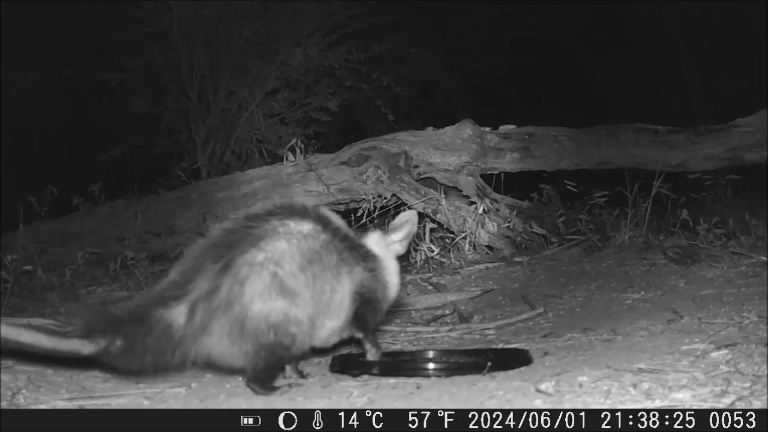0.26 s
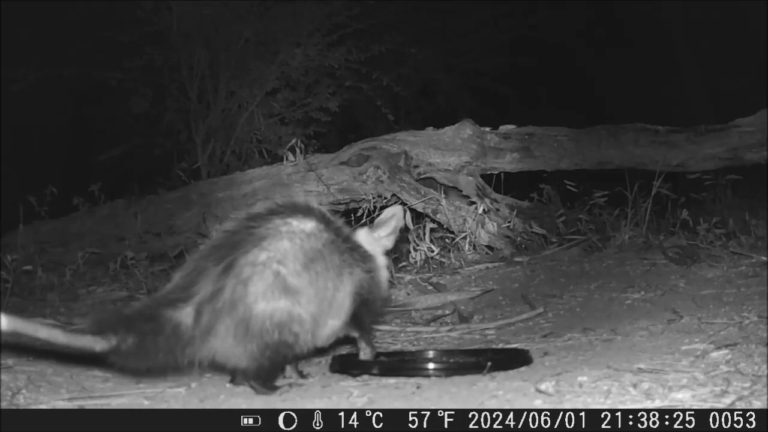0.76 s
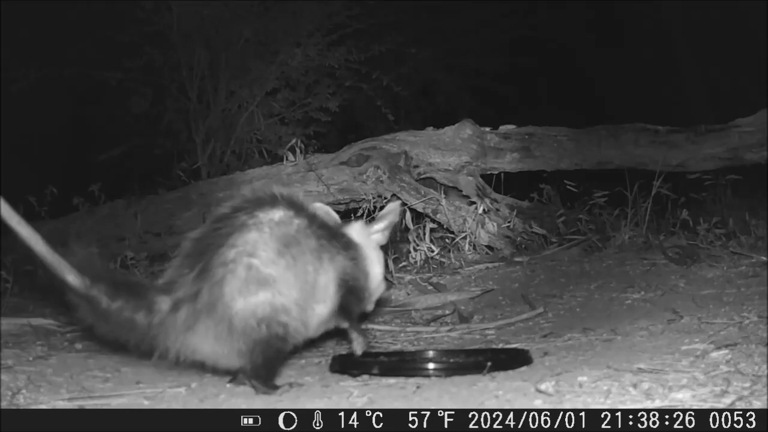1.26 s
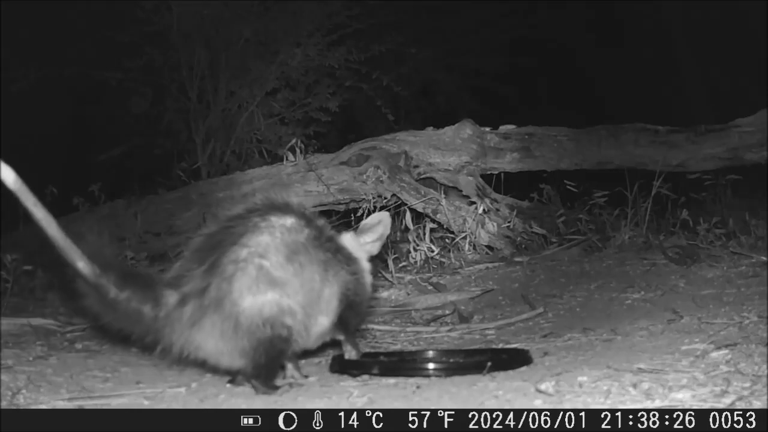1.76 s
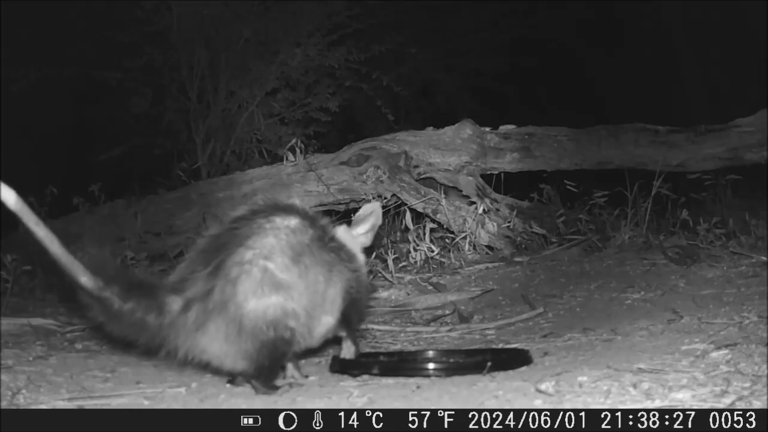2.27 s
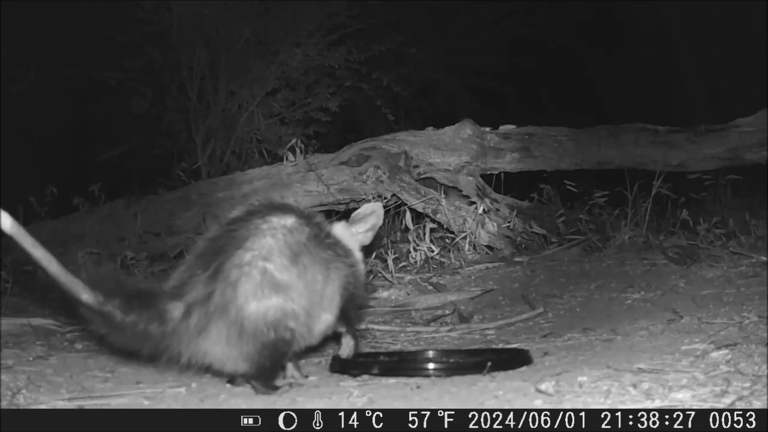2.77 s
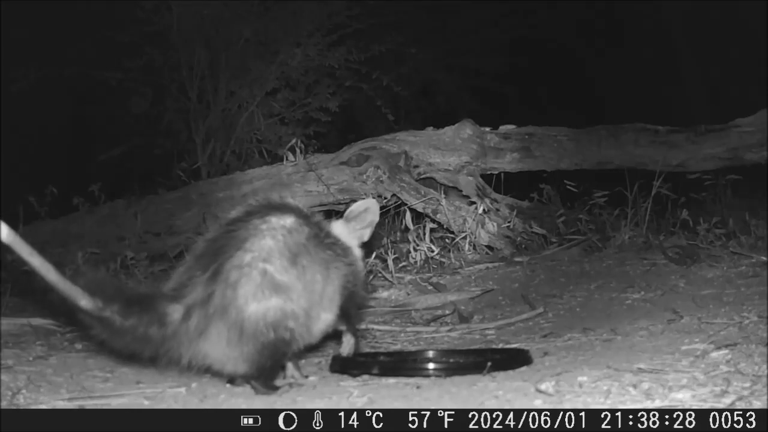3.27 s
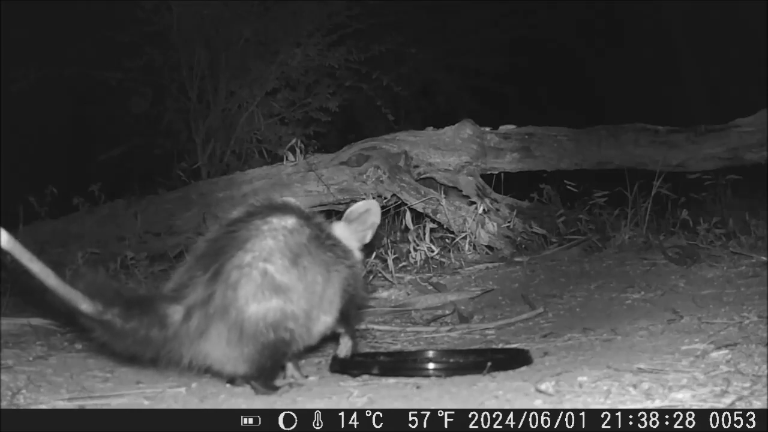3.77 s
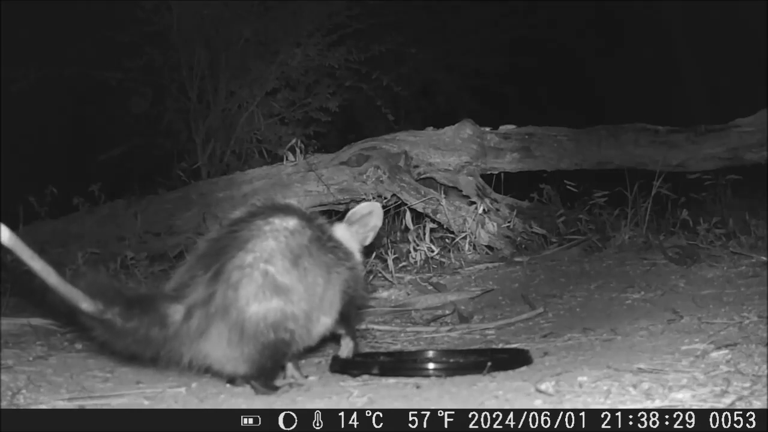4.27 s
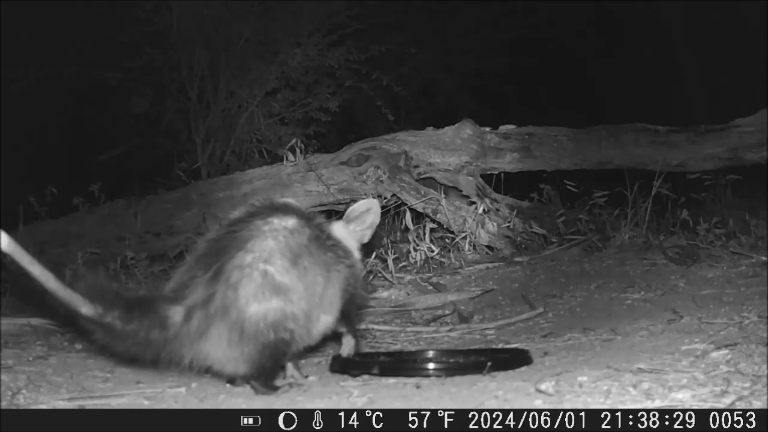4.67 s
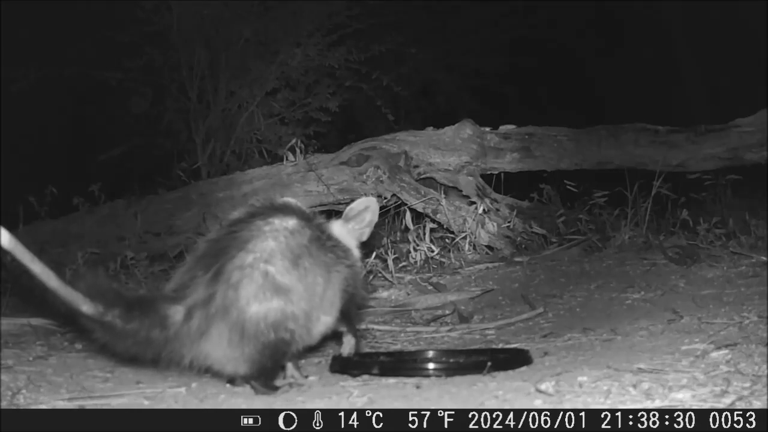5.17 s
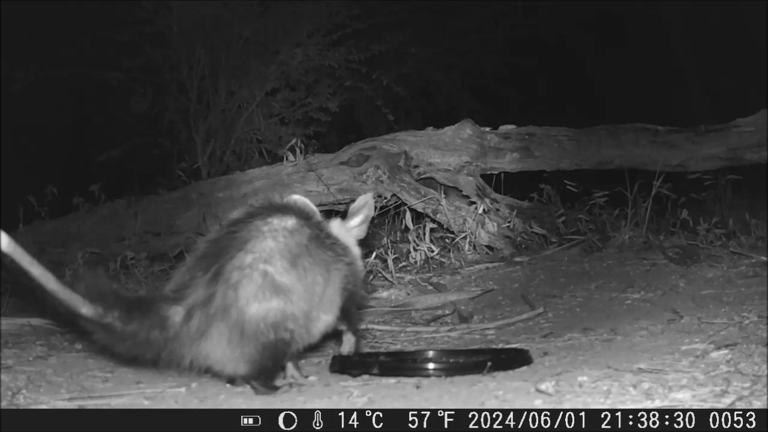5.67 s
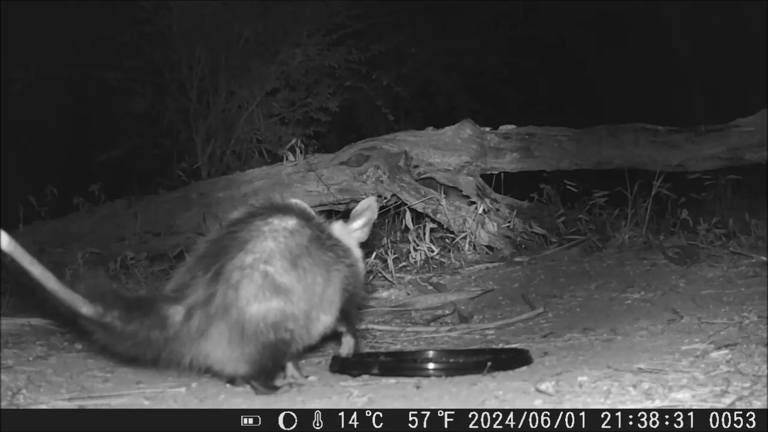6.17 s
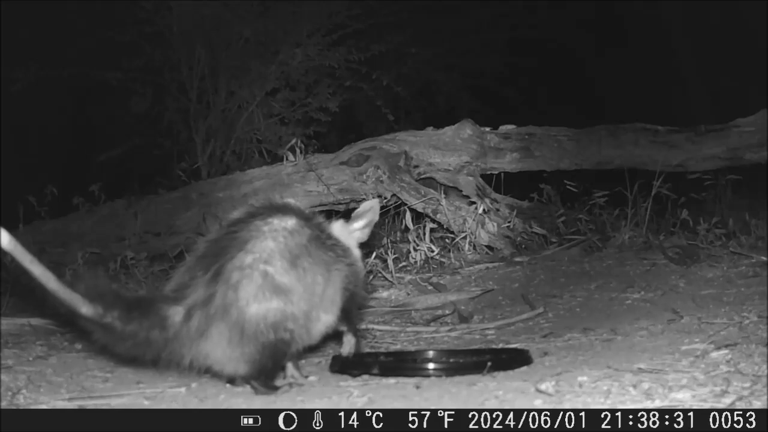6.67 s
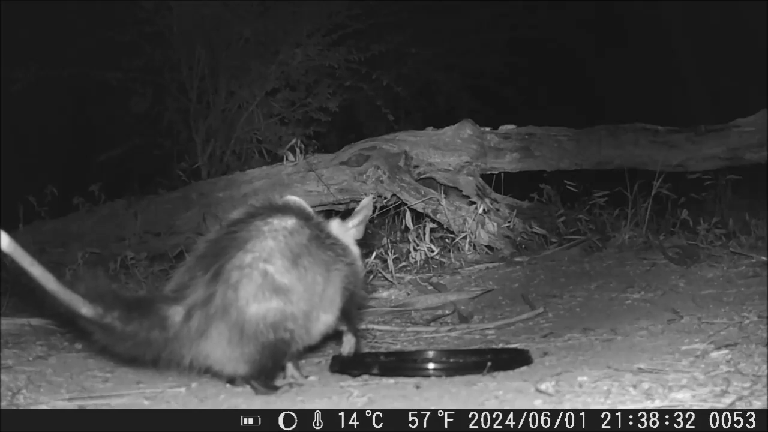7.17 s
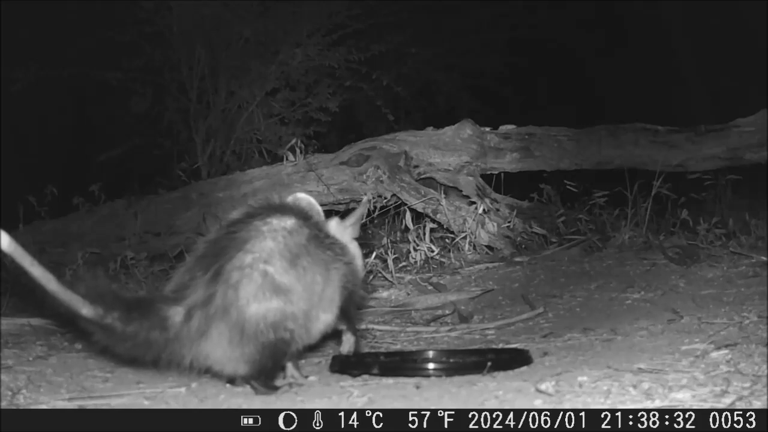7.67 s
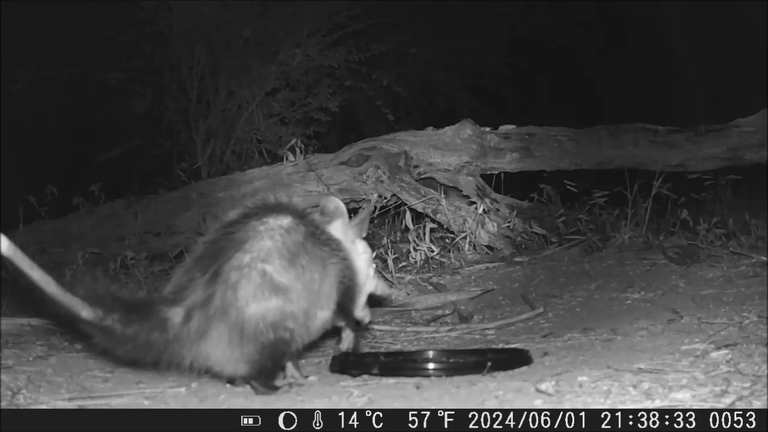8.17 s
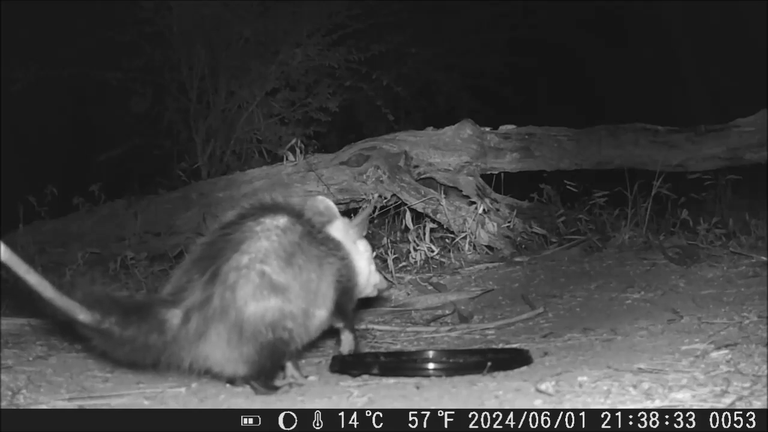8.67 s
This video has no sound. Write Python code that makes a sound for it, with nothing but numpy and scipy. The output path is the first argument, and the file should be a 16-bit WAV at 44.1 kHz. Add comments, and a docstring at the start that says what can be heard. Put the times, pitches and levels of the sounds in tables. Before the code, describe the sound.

A nearby cricket trills high and steadily at the edge of a wood at night, its song often breaking into quick chirps and growing a little louder later on. Another insect rasps in groups of short hissing syllables, about two groups a second. A distant cricket chorus sings lower and a faint bush cricket ticks very high. Far machinery hums softly underneath, all picked up by one microphone.

```python
"""A near cricket trills at a wood edge at night, each wing stroke a tone pulse that falls in pitch.
A broad rasping hiss calls in groups of short syllables, about two groups a second.
A small bush cricket ticks high, and a far chorus sings lower; the undergrowth scatters their songs.
Machinery hums far off under the night air, and one soft tick sounds nearby.
One microphone hears it all, and the recorder drops out once for a few milliseconds."""
import sys
import numpy as np
from scipy import signal
from scipy.fft import rfft, irfft, next_fast_len
from scipy.io import wavfile
from scipy.ndimage import uniform_filter1d, map_coordinates

SR = 44100
rng = np.random.default_rng(int(sys.argv[2]) if len(sys.argv) > 2 else 0)


def digitize_waveform(pressure):
    """Quantize a signal to 16-bit integers and store it at the path in sys.argv[1].

    Rows of a 2-D input are taken as channels; values are limited to [-1, 1].
    """
    field = np.atleast_2d(pressure).T
    bounded = np.clip(field, -1, 1)
    quanta = np.round(bounded * 32767).astype(np.int16)
    wavfile.write(sys.argv[1], SR, quanta)


N = 393813
TIME = np.arange(N) / SR


def amp(db):
    """Amplitude ratio: a factor of ten for every 20 dB."""
    return 10 ** (np.asarray(db) / 20)


def unit(x):
    """Normalisation to an rms of 1."""
    return x / np.sqrt(np.mean(x ** 2) + 1e-20)


def curves(rows):
    """Linear interpolation over time of each column after the first."""
    times, *columns = np.transpose(rows)
    return [np.interp(TIME, times, column) for column in columns]


def wobble(rate):
    """Random modulation: a smooth curve through rate Gaussian knots a second."""
    coarse = TIME[::64]
    knots = rng.standard_normal(int(N * rate / SR) + 4)
    return np.interp(TIME, coarse, map_coordinates(knots, [coarse * rate]))


def filtered(x, response):
    """Linear filtering: the spectrum is multiplied by a frequency response."""
    size = next_fast_len(N + SR // 2)
    return irfft(rfft(x, size) * response(np.fft.rfftfreq(size, 1 / SR)), size)[..., :N]


def hiss(spectrum, patchy_db):
    """Spectral shaping: coloured noise of rms 1, its gain patchy in time and frequency."""
    frames = signal.stft(rng.standard_normal(N), nperseg=512)[2]
    patches = uniform_filter1d(rng.standard_normal(frames.shape), size=5, axis=0)
    patches = uniform_filter1d(patches, size=10, axis=1)
    white = signal.istft(frames * amp(patchy_db * unit(patches)), nperseg=512)[1][:N]
    knot_hz, db = np.transpose(spectrum)
    return unit(filtered(white, lambda hz: amp(np.interp(np.log(hz + 1), np.log(knot_hz), db))))


def pulses(times, hz, db, half_s, glide_hz, overtone_db=-60):
    """Linear chirps under raised-cosine envelopes centred on times, gliding by glide_hz per half_s."""
    t = np.arange(-300, 301) / SR
    phase = 2 * np.pi * (hz[:, None] * t + glide_hz / half_s * t * t / 2 + rng.random((len(times), 1)))
    wave = np.sin(phase) + amp(overtone_db) * np.sin(2 * phase)
    envelope = np.cos(np.pi / 2 * np.clip(t / half_s, -1, 1)) ** 2
    samples = np.round((times[:, None] + t) * SR).astype(int).clip(0, N)
    return np.bincount(samples.ravel(), (amp(db)[:, None] * envelope * wave).ravel(), N + 1)[:N]


def echoes(x, t60, count=4):
    """Diffuse scattering in undergrowth: decaying tails whose mix changes as leaves and singer shift."""
    t = np.arange(SR // 4) / SR
    tails = rng.standard_normal((count, len(t))) * amp(-60 * t / t60)
    tails /= np.linalg.norm(tails, axis=1, keepdims=True)
    answers = signal.fftconvolve(x[None], tails, axes=1)[:, :N]
    shares = np.array([wobble(5) for _ in answers])
    return np.sum(answers * shares, axis=0) / np.linalg.norm(shares, axis=0)


def night_air():
    """Ambient noise: a continuous spectrum with a low rumble and a high band of hiss."""
    # Each row: frequency in Hz, relative spectral density in dB.
    spectrum = [(15, -42), (35, -6), (60, -0.5), (130, -7.5), (250, -16.5), (450, -25), (900, -26),
                (1700, -23.5), (2100, -32), (2450, -17.5), (3600, -35), (5000, -26.5), (6200, -5),
                (7500, -24), (10200, -31.5), (11300, -35.5), (12000, -25), (13200, -26), (14000, -44),
                (16500, -53)]
    return amp(-52.5) * hiss(spectrum, patchy_db=1.0)


def machinery_hum():
    """A line spectrum from far machinery: random modulation broadens a low tone and higher lines."""
    # The low tone. Each row: time in seconds, level in dB.
    levels = [(0, -53.5), (1.7, -52), (3.0, -54.5), (3.21, -49.5), (3.41, -59), (3.6, -52.5), (4.25, -53.5),
              (4.43, -61), (4.6, -56), (5.3, -55.5), (6.0, -54.5), (7.9, -55.5), (8.03, -59.5), (8.23, -53),
              (8.93, -57)]
    # The higher lines. Each row: frequency in Hz, mean level in dB, frequency waver in Hz.
    lines = [(117.5, -65.5, 2.5), (175.8, -76, 3.28), (239.4, -71, 0.61), (294, -83, 2.6), (418, -86.5, 3),
             (779, -90, 1.5), (840, -91, 1.5)]
    tone = np.sqrt(2) * np.sin(2 * np.pi * 57.3 * TIME + 0.13 * wobble(5) + 0.046 * wobble(40))
    out = amp(curves(levels)[0] + 1.05 * wobble(5.7) + 0.32 * wobble(40)) * tone
    for hz, db, waver_hz in lines:
        phase = 2 * np.pi * np.cumsum(hz + waver_hz * wobble(14)) / SR
        out += amp(db + 2.83 * wobble(9)) * np.sqrt(2) * np.sin(phase)
    return out


def tick():
    """A damped sinusoid, heard as one soft, dull tick nearby."""
    start_s, peak_db, hz, t60 = 5.281, -42, 1160, 0.011
    age = np.clip(TIME - start_s, 0, 1)
    return amp(peak_db - 60 * age / t60) * np.sin(2 * np.pi * hz * age)


def far_chorus(count=4000):
    """Incoherent superposition: rising pulses of many far crickets, about half of the power echo."""
    # Each row: time in seconds, level in dB.
    levels = [(0.0, -52.5), (3.6, -51.5), (3.88, -54.5), (4.03, -50), (4.58, -53), (4.63, -51.5),
              (6.22, -51), (6.29, -44.5), (6.37, -52.5), (6.89, -48), (6.94, -52), (7.78, -48.5),
              (7.86, -51.5), (8.93, -50.5)]
    hz_jitter, db_jitter, time_jitter = rng.standard_normal((count, 3)).T
    times = (np.arange(count) + 1.5 * time_jitter) * N / SR / count
    song = pulses(times, 2840 + 75 * hz_jitter, 0.4 * db_jitter, half_s=0.0057, glide_hz=60.3)
    return amp(curves(levels)[0] + .6 * wobble(6)) * unit(song + amp(-0.5) * echoes(song, t60=0.68))


def bush_cricket(count=880):
    """A high resonance ticks about a hundred times a second; amplitude modulation adds throbs."""
    # Spells of throbbing. Each row: first peak in seconds, length in seconds, depth in dB.
    throbs = [(0.888, .9, 2.5), (1.91, 0.56, 0.5), (3.09, 0.29, 1.5), (4.42, .7, 2), (5.216, 0.23, 4),
              (5.94, .1, 3), (6.238, .1, 1), (8.167, 0.53, 2.5)]
    mean_db, resonance_hz, throbs_per_s, scatter_s = -64.5, 9085, 4.84, .002
    time_jitter, hz_jitter, db_jitter = rng.standard_normal((count, 3)).T
    times = np.arange(count) * N / SR / count + scatter_s * time_jitter
    level_db = mean_db + 0.43 * wobble(14)
    for first_peak, length, depth_db in throbs:
        beat = (TIME - first_peak) * throbs_per_s
        throbbing = (beat > -3 / 4) & (beat < length * throbs_per_s + 1 / 4)
        level_db += depth_db * np.cos(2 * np.pi * beat) * throbbing
    hz = resonance_hz + 60 * np.interp(times, TIME, wobble(9)) + 130 * hz_jitter
    song = pulses(times, hz, 2.3 * db_jitter, half_s=0.0015, glide_hz=-350)
    return amp(level_db) * unit(song + amp(13) * echoes(song, t60=0.2, count=8))


def rasp():
    """Amplitude-modulated noise in three bands: syllables rise, hold and fade, adding in power."""
    # Each row: centre of a syllable in seconds, then its treble, middle and low levels in dB.
    syllables = [(0.064, -61, -50.5, -56.5), (0.192, -60, -50, -59), (0.465, -61, -50.5, -54.5),
                 (0.564, -60, -49.5, -55), (0.658, -61, -49.5, -55), (0.801, -62, -49.5, -55),
                 (0.928, -60, -50, -60), (1.2, -61, -52, -55), (1.312, -60, -49, -55),
                 (1.426, -61, -48, -55.5), (1.845, -59, -49, -53.5), (1.972, -57.5, -47.5, -55.5),
                 (2.308, -59, -48, -54.5), (2.438, -57.5, -47.5, -54.5), (2.72, -61, -52.5, -55),
                 (2.858, -62, -51.5, -54.5), (2.995, -68, -56, -65), (3.198, -61, -50.5, -59),
                 (3.381, -57, -46, -51.5), (3.524, -58, -48, -55.5), (3.951, -61, -49.5, -55),
                 (4.064, -57, -45.5, -52), (4.181, -59, -49, -53.5), (4.68, -57, -46, -52),
                 (4.819, -55.5, -45.5, -52.5), (5.284, -60, -49.5, -59.5), (5.42, -60, -48, -55.5),
                 (5.619, -61, -52.5, -60), (5.757, -57, -46.5, -57), (5.914, -63, -49.5, -57),
                 (6.156, -56, -47.5, -53.5), (6.289, -56.5, -47.5, -52.5), (6.663, -59, -48, -54),
                 (6.774, -58, -48, -53), (6.868, -61, -48.5, -57), (7.095, -61, -51.5, -59),
                 (7.22, -60, -52, -58.5), (7.564, -55.5, -46, -52), (7.703, -55, -44, -53),
                 (8.217, -71, -57, -69), (8.346, -69, -58, -67), (8.478, -59, -47.5, -54.5),
                 (8.597, -56, -47, -53.5), (8.71, -57, -48, -60)]
    # The three bands. Each row: frequency in Hz, relative spectral density in dB.
    treble_spectrum = [(6500, -67), (8000, -9.5), (10000, -7), (12500, -2), (14300, -2.5), (15200, 1),
                       (16500, -1.5)]
    middle_spectrum = [(1000, -47.5), (2400, -7.5), (3000, -5), (3750, -12), (4300, -6), (4550, -3.5),
                       (4800, -3.2), (5050, -5), (5600, -6.5), (6600, -16.5), (7600, -22.5), (8500, -72)]
    low_spectrum = [(900, -53.5), (1300, -15.5), (1700, -12.5), (1950, 1), (2200, 1.5), (2500, -25),
                    (3000, -40.5)]
    # Faint tones in the hiss. Each row: centre and half length in seconds, peak in dB, pitch in Hz.
    whistles = [(.93, .04, -52.5, 1945), (3.497, 0.037, -50, 1950), (5.617, 0.054, -53, 1930),
                (5.757, 0.05, -51, 1950), (7.214, .055, -53, 1910), (7.72, .04, -54, 1957),
                (8.718, 0.036, -51, 1945), (5.623, .04, -52, 4530), (5.917, 0.044, -52, 4600),
                (6.16, .05, -50, 4550), (7.2, .04, -51, 4800), (7.53, 0.045, -48.5, 4720),
                (8.6, .04, -47.5, 4560)]
    # Each triple runs treble, middle, low.
    rise_db_per_s, fall_db_per_s, rest_db = (200, 200, 258), (118, 125, 192), (-77, -58, -62)
    hold_s = 0.063
    power = amp(rest_db)[:, None] ** 2
    for centre, *bands_db in syllables:
        rise_db = np.outer(rise_db_per_s, np.minimum(TIME - centre + hold_s / 2, 0))
        fall_db = np.outer(fall_db_per_s, np.maximum(TIME - centre - hold_s / 2, 0))
        power = power + amp(np.array(bands_db)[:, None] + rise_db - fall_db) ** 2
    treble = amp(.5 * wobble(25)) * hiss(treble_spectrum, patchy_db=-1.0)
    middle = amp(0.47 * wobble(25)) * hiss(middle_spectrum, patchy_db=1.0)
    low = amp(0.77 * wobble(18)) * hiss(low_spectrum, patchy_db=1.5)
    out = np.sum(np.sqrt(power) * [treble, middle, low], axis=0)
    phase_waver = 1.9 * wobble(30)
    for centre, half_s, peak_db, hz in whistles:
        swell = np.cos(np.pi / 2 * np.clip((TIME - centre) / half_s, -1, 1))
        out += amp(peak_db) * swell * np.sin(2 * np.pi * hz * TIME + phase_waver)
    return out


def stroke_rate(idle_per_s):
    """Pulse repetition rate: the wings speed up into each bout, sag, then relax exponentially to idle."""
    # Each row: start in seconds, onset of tiring in seconds, strokes a second before the sag.
    bouts = [(0.03, 1.726, 90.44), (2.353, 3.868, 92.4), (4.455, 5.497, 92.57), (5.618, 6.835, 93.3),
             (7.323, 8.687, 92.44)]
    sag_per_s, pick_up_s, sag_s, tire_s = 2.45, .065, .4, .096
    rate = np.full(N, idle_per_s)
    for start, tires, fast_per_s in bouts:
        pick_up = .5 + .5 * np.tanh((TIME - start) / pick_up_s)
        sag = sag_per_s * np.exp(np.minimum(TIME - tires, 0) / sag_s)
        relax = np.exp(-np.maximum(TIME - tires, 0) / tire_s)
        rate += (fast_per_s - idle_per_s - sag) * pick_up * relax
    return rate


def ground_reflection(song):
    """Comb filtering: the direct sound interferes with a ground reflection whose path changes."""
    # Each row: time in seconds, delay in milliseconds, level against the direct sound in dB.
    reflection = [(0, 3.265, -7), (1.8, 3.265, -7), (2.2, 3.295, -8), (3.9, 3.29, -7), (4.15, 3.29, -25),
                  (4.25, 2.2, -25), (4.6, 2.19, -8), (6.1, 2.145, -8.5), (8.93, 2.15, -9)]
    delay_ms, db = curves(reflection)
    return song + amp(db) * map_coordinates(song, [np.arange(N) - delay_ms * SR / 1000], order=3)


def near_cricket():
    """Stridulation: each wing stroke across the file is a tone that falls as the wing slows."""
    # Each row: time in seconds, then the level in dB and pitch in Hz that hold within a bout.
    contour = [(0, -49.5, 6520), (1.6, -47.5, 6560), (2.5, -49, 6440), (3.4, -48, 6560), (4.6, -48.5, 6370),
               (5.5, -46, 6420), (6.6, -44, 6520), (7.5, -46, 6490), (8.5, -43.5, 6480), (8.93, -43, 6560)]
    # Breaks that split the trill into chirps. Each entry: seconds when a stroke barely touches the file.
    skips = [0.177, 0.253, 0.34, 0.409, 0.486, 0.563, 0.653, 0.73, 0.82, 0.91, 1.141, 1.231, 1.32, 1.407,
             1.497, 1.586, 1.667, 1.771, 2.382, 2.514, 2.677, 2.915, 3.002, 3.1, 3.219, 3.403, 3.502, 3.79,
             3.858, 4.548, 4.767, 4.843, 4.931, 5.017, 5.093, 5.18, 5.268, 5.355, 5.454, 5.544, 5.647,
             5.712, 5.927, 6.002, 6.088, 6.174, 6.27, 6.356, 6.454, 6.54, 6.638, 6.716, 6.804, 6.893, 7.351,
             7.415, 7.491, 7.631, 7.707, 7.793, 7.879, 7.977, 8.075, 8.162, 8.261, 8.349, 8.448, 8.536,
             8.625, 8.725, 8.809]
    idle_per_s, idle_drop_hz, idle_drop_db = 76.28, 120, 1.5  # slower, lower and softer between bouts
    rate = stroke_rate(idle_per_s)
    idleness = (rate.max() - rate) / (rate.max() - idle_per_s)
    strokes_made = np.cumsum(rate) / SR - .52  # about half a cycle passes before the first stroke
    times = np.interp(np.arange(int(strokes_made[-1]) + 1), strokes_made, TIME)
    db_jitter, hz_jitter, time_jitter = rng.standard_normal((len(times), 3)).T
    level_db, pitch_hz = curves(contour)
    db = 0.19 * db_jitter
    skipped = np.abs(times[:, None] - np.array(skips)).argmin(axis=0)
    db[skipped] -= 16
    db[skipped - 1] -= 1.5  # the strokes beside a break are weaker too
    db[skipped + 1] -= 2
    hz = np.interp(times, TIME, pitch_hz - idle_drop_hz * idleness) + 40 * hz_jitter
    times = times - .0008 + .0003 * time_jitter
    strokes = pulses(times, hz, db, half_s=0.0033, glide_hz=-650, overtone_db=-33.5)
    # Each stroke trails off in a weaker, lower tone.
    trails = pulses(times + .0026, hz - 420, db - 6, half_s=0.0015, glide_hz=-450)
    song = ground_reflection(unit(strokes + trails))
    return amp(level_db - idle_drop_db * idleness) * unit(song + amp(-6.5) * echoes(song, t60=.35))


def scene():
    """Superposition: all sources add at one microphone, which feeds both channels."""
    mono = night_air() + near_cricket() + far_chorus() + bush_cricket() + rasp() + machinery_hum() + tick()
    return np.array([mono, mono])


def record(dry):
    """Dropout and band limiting: the recorder all but loses a few milliseconds and cuts the top treble."""
    from_s, to_s, dropout_db, top_hz = 5.5487, 5.5548, -22, 15730
    gain = np.where((TIME > from_s) & (TIME < to_s), amp(dropout_db), 1)
    return filtered(dry * gain, lambda hz: hz < top_hz)


dry = scene()
out = record(dry)
digitize_waveform(out)
```